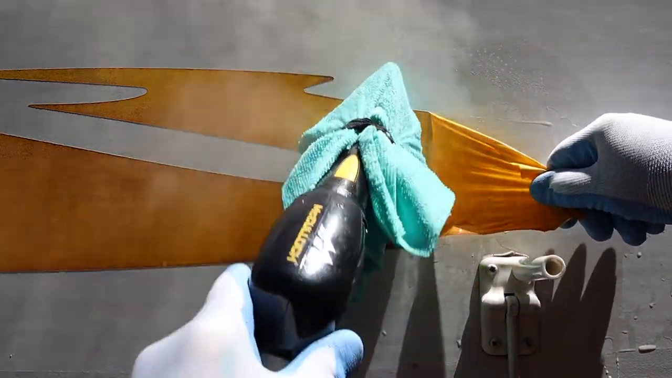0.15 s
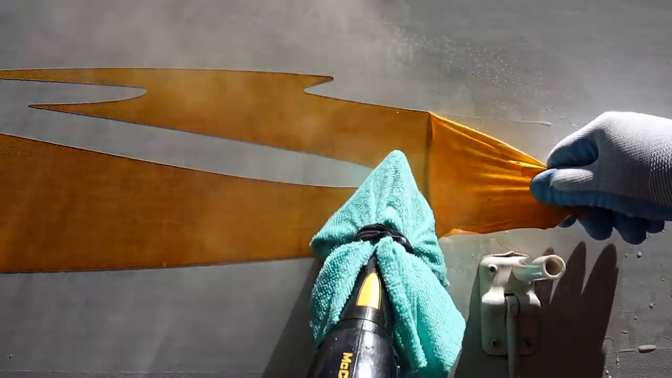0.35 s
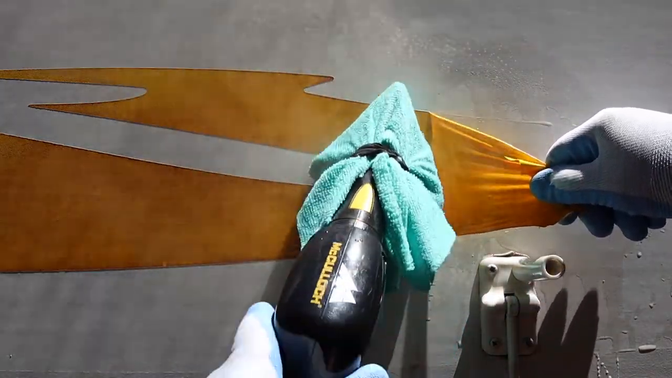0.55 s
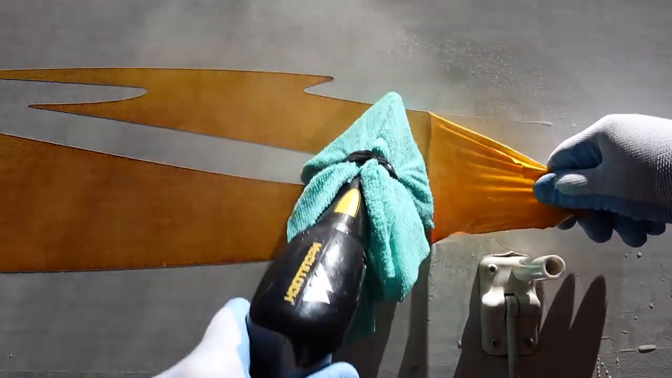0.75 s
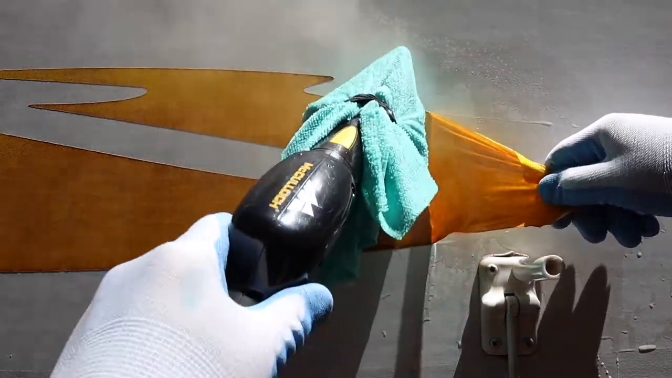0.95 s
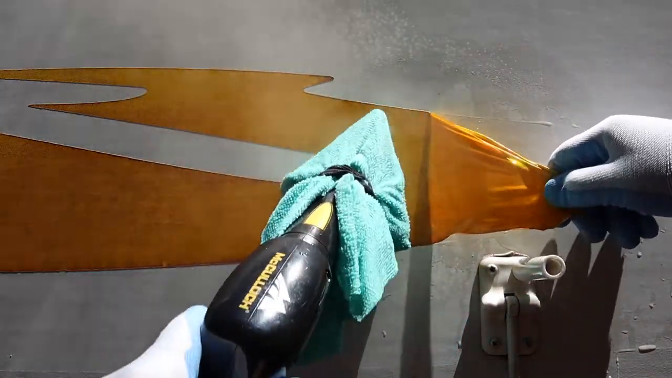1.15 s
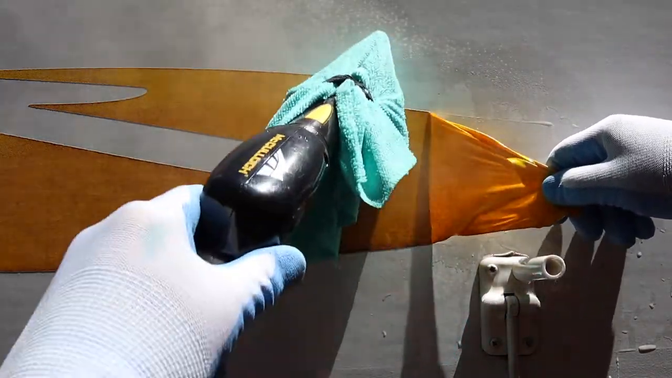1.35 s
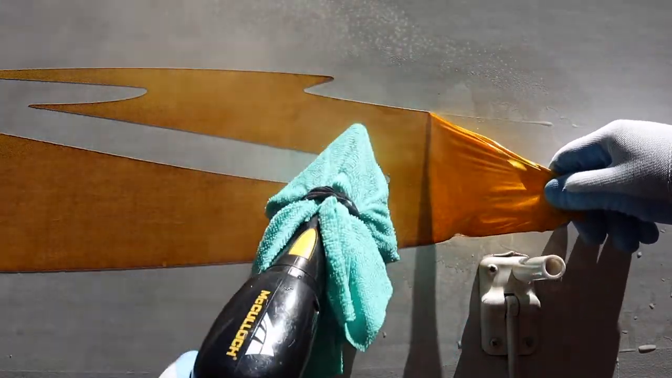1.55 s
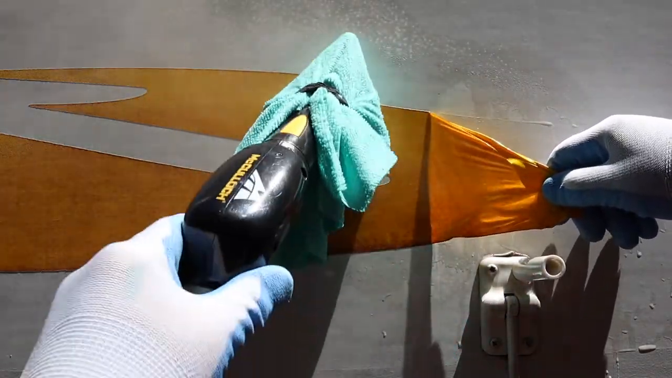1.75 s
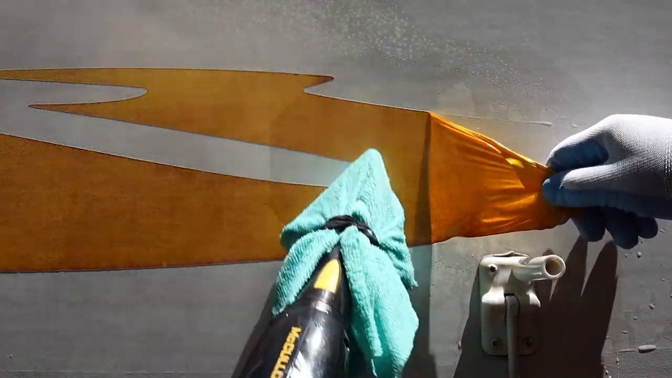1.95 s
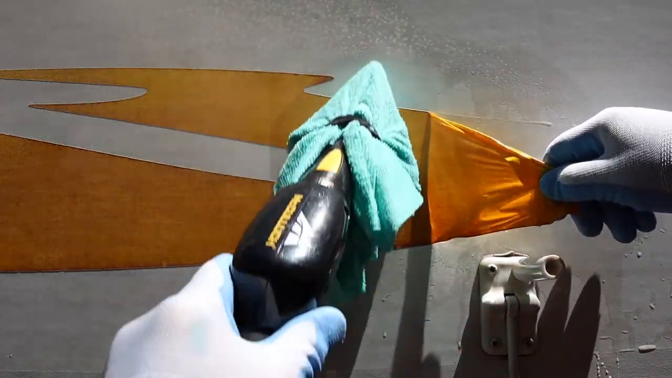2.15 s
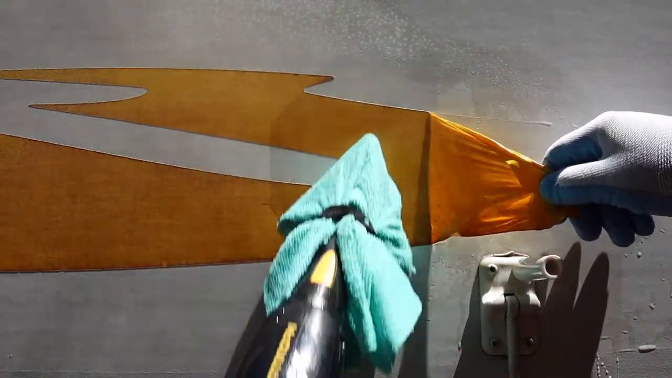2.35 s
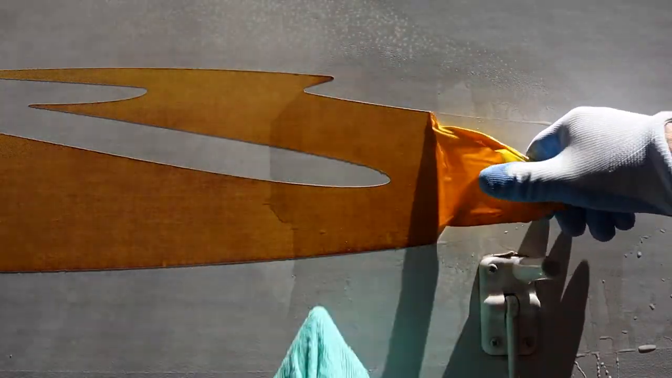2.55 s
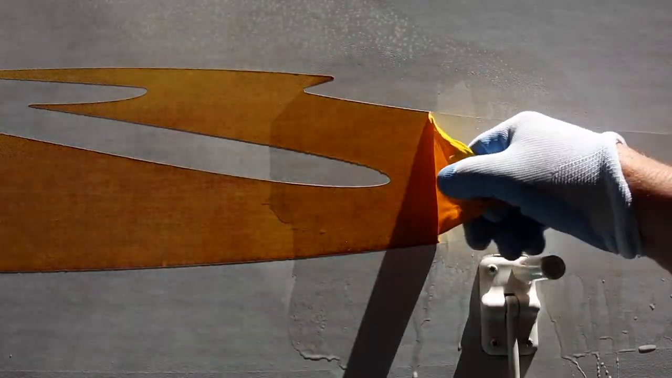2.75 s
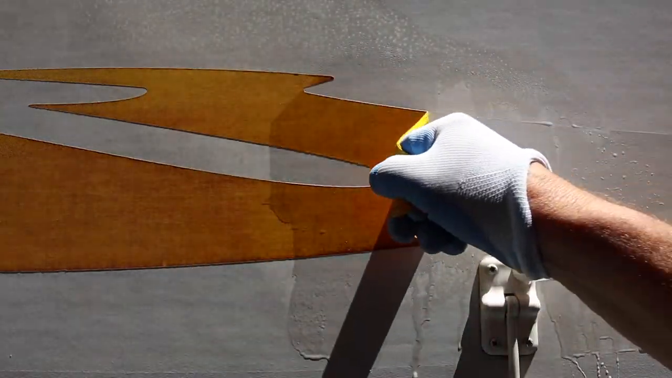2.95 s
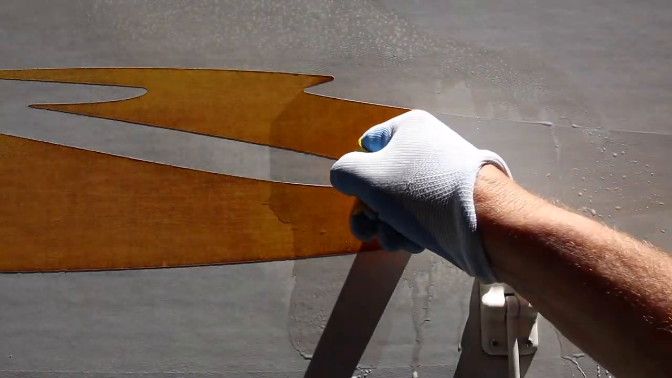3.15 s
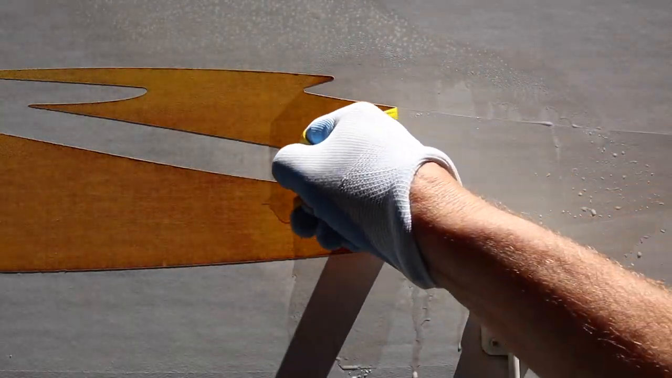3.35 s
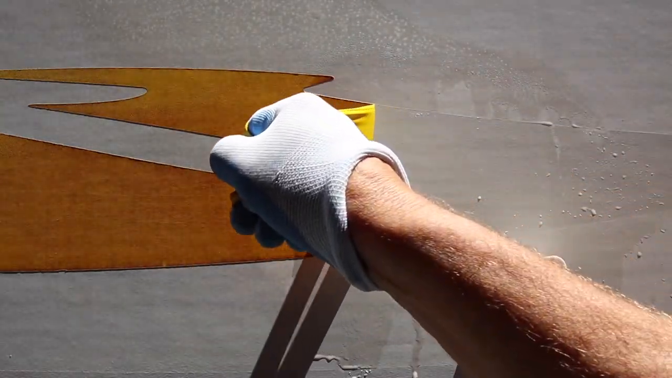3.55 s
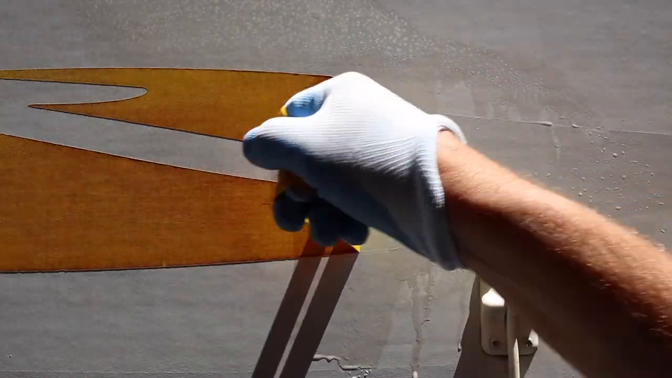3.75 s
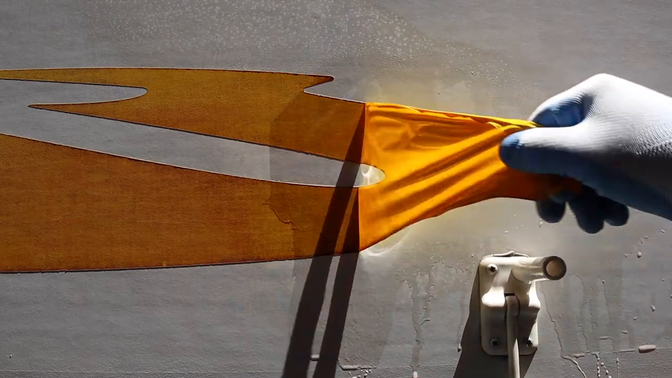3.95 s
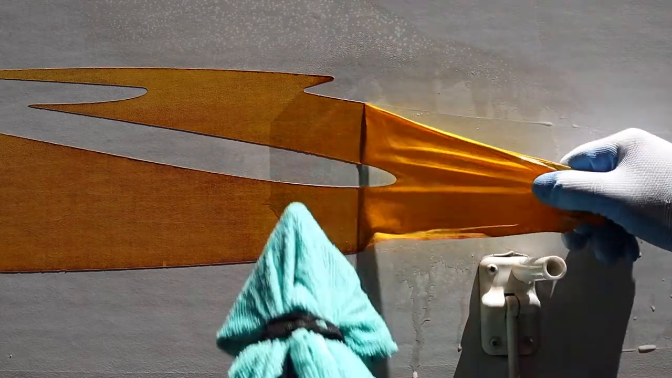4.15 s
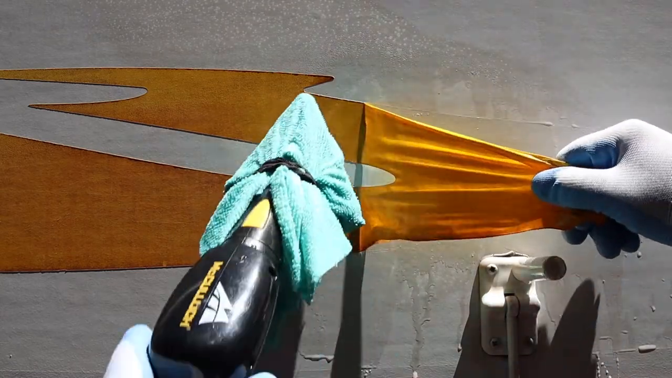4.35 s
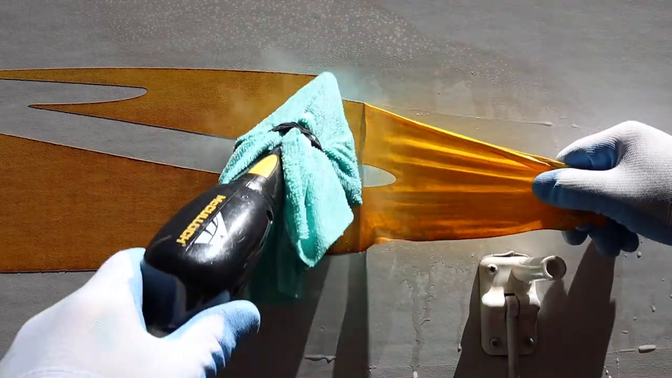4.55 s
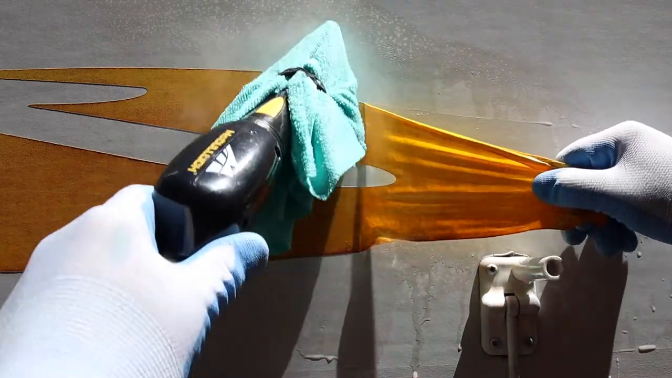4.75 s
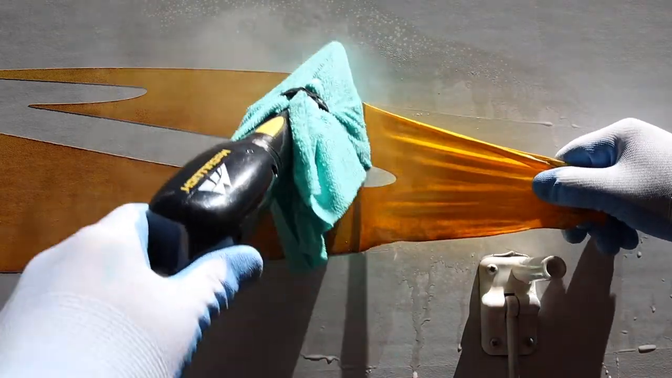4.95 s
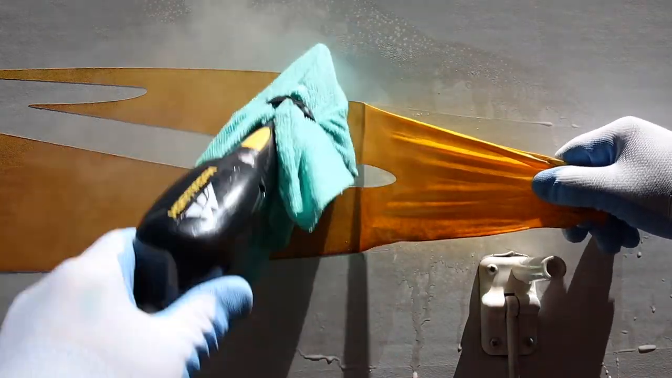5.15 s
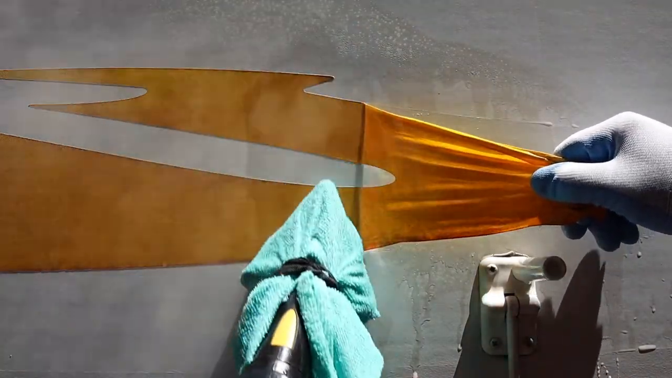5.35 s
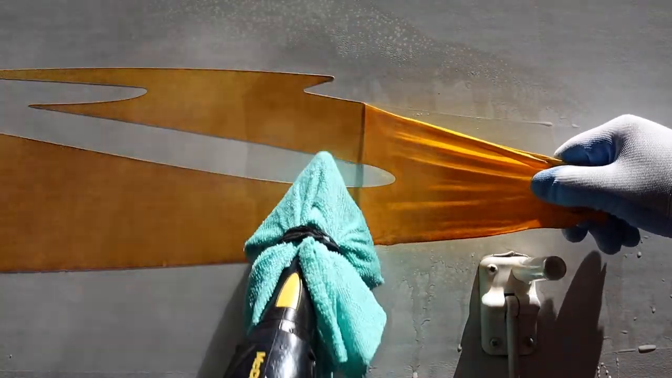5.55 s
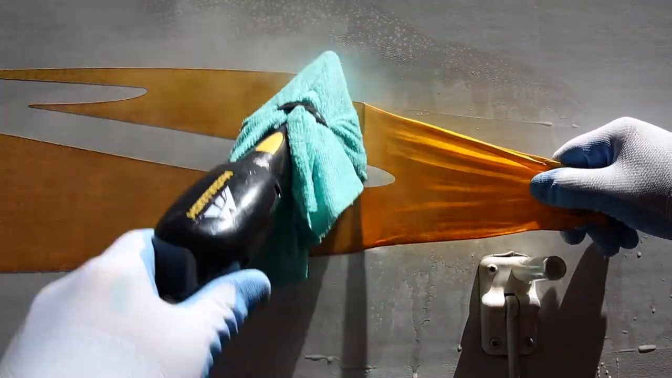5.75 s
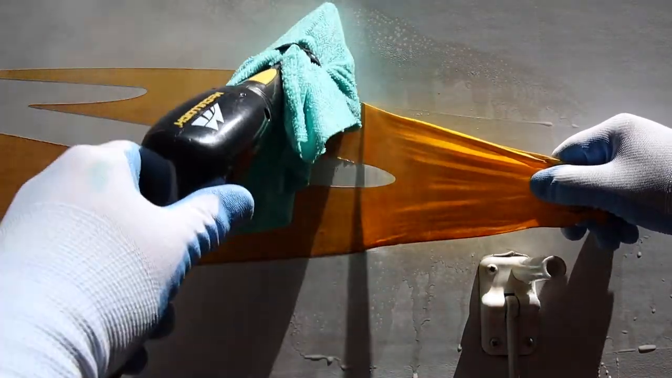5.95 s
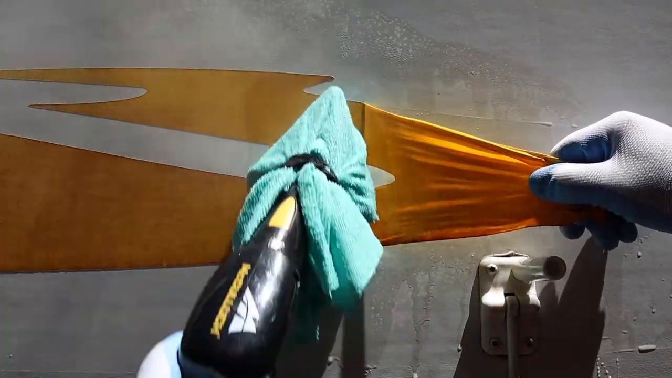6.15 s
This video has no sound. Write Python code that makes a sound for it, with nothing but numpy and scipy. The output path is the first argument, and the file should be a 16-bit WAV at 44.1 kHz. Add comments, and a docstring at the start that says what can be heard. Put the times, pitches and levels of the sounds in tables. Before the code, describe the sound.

A handheld steam jet hisses steadily through cloth, shuts off, vinyl snaps and crackles as it is peeled, then the hiss bursts back.

```python
"""The steady hiss of a handheld steam cleaner, its head in a towel, opens the scene in mid-blast by a smooth panel.
Jet turbulence is noise shaped by hose resonances and a valve; a second blast lasts to the end.
Between the blasts a gloved hand regrips and peels a vinyl sheet: decaying sines and noise bursts
make thumps, snaps and creaks, and sparse noise grains make the rustle.
Low noise with random swells is a light breeze on the microphone, over a far outdoor murmur."""
import sys
import numpy as np
from scipy import signal
from scipy.fft import rfft, irfft, next_fast_len
from scipy.io import wavfile
from scipy.ndimage import uniform_filter1d, map_coordinates

SR = 44100
rng = np.random.default_rng(int(sys.argv[2]) if len(sys.argv) > 2 else 0)


def wrap_up_sound(samples):
    """Save the sound to the file named by the first command line argument, as 16-bit audio."""
    columns = np.atleast_2d(samples).T
    # keep every value between -1 and 1, then stretch to whole-number steps
    tamed = np.clip(columns, -1, 1)
    steps = np.round(tamed * 32767).astype(np.int16)
    wavfile.write(sys.argv[1], SR, steps)


N = 274302
TIME = np.arange(N) / SR
STRIKE_TIME = np.arange(SR // 5) / SR  # time since a short event began, s

# Pulls of the trigger: (valve opens [s], starts to shut [s])
BLASTS = [(-1, 2.456), (4.5135, 7)]
# Likeness of the two microphone ports to a near source: (frequency [Hz], correlation [-1 to 1])
NEAR_LIKENESS = [(60, 1), (700, 1), (1400, 0.96), (3000, 0.84), (6000, 0.92), (10000, 0.34)]
# Likeness of the two ports to sound from all around: (frequency [Hz], correlation [-1 to 1])
DIFFUSE_LIKENESS = [(60, 1), (240, 1), (930, -0.08), (3670, -0.61), (14500, -0.47)]

OPEN_S, SHUT_S = .011, .023  # travel time of the valve
FIZZ_HZ, SIZZLE_HZ = 4270, 8000  # lower edges of the two treble bands


def amp(db):
    """Decibels to amplitude ratio: 20 dB is a factor of ten."""
    return 10 ** (np.asarray(db) / 20)


def unit(x):
    """Scale to a root-mean-square of 1."""
    return x / np.sqrt(np.mean(x ** 2) + 1e-20)


def along(points, hz):
    """Interpolate (frequency [Hz], value) points on a logarithmic frequency axis."""
    f, v = np.transpose(points)
    return np.interp(np.log(hz + 1), np.log(f + 1), v)


def curves(rows):
    """Interpolate each column after the time to one value per sample."""
    s, *columns = np.transpose(rows)
    return [np.interp(TIME, s, column) for column in columns]


def wobble(rate):
    """A smooth random curve: a spline through random knots, rate of them a second."""
    knots = rng.standard_normal(int(N * rate / SR) + 4)
    return map_coordinates(knots, [TIME * rate])


def filtered(x, response):
    """Linear filtering: the spectrum of x times a complex response of frequency."""
    m = next_fast_len(N + SR // 2)
    return irfft(rfft(x, m) * response(np.fft.rfftfreq(m, 1 / SR)), m)[..., :N]


def shaped(points):
    """Amplitude response through (frequency [Hz], level [dB]) points."""
    return lambda hz: amp(along(points, hz))


def band(lo_hz, hi_hz):
    """A soft-edged band whose neighbours add up in power."""
    return lambda hz: np.sqrt(np.abs(1 / (1 + (hz / hi_hz) ** 8) - 1 / (1 + (hz / lo_hz) ** 8)))


def resonances(modes):
    """Causal response of damped oscillators: (centre [Hz], width [Hz], peak level [dB])."""
    return lambda f: sum(amp(db) * 1j * f * w / (c * c - f * f + 1j * f * w) for c, w, db in modes)


def ports(pair, likeness, lead):
    """Interchannel coherence: mix two unrelated signals into left and right; their sum keeps its colour."""
    def mix(hz):
        like = np.clip(along(likeness, hz), -.95, 1)
        turn = np.arccos(like) / 2
        sum_gain = np.sqrt((1 + like * np.cos(along(lead, hz))) / 2)
        return [np.cos(turn), np.sin(turn)] / sum_gain

    def advance(hz):
        return np.exp(np.outer([.5j, -.5j], along(lead, hz)))  # left leads right

    common, difference = filtered(pair, mix)
    return filtered(np.array([common + difference, common - difference]), advance)


def hiss(colour, patchy_db):
    """Coloured turbulence: two noises of rms 1 whose gain varies in random time-frequency patches."""
    spectra = signal.stft(rng.standard_normal((2, N)), nperseg=512)[2]
    patches = rng.standard_normal(spectra.shape[1:])
    patches = uniform_filter1d(patches, size=8, axis=0)  # over frequency
    patches = uniform_filter1d(patches, size=12, axis=1)  # over time
    patchy = signal.istft(spectra * amp(patchy_db * unit(patches)), nperseg=512)[1][:, :N]
    return unit(filtered(patchy, colour))


def pressure():
    """Pressure release: the valve travels, stored steam bursts out, then the boiler slowly sags."""
    settled_db = -20  # after the burst, before the sag
    burst_db, burst_s, sag_db_per_s = 7.5, 0.066, 0.53
    flow = np.zeros(N)
    for opens, shuts in BLASTS:
        since = np.clip(TIME - opens, 0, None)
        opening = np.clip(since / OPEN_S, 0, 1) ** 2
        closing = np.sqrt(np.clip(1 - (TIME - shuts) / SHUT_S, 0, 1))
        level_db = settled_db + burst_db * np.exp(-since / burst_s) - sag_db_per_s * since
        flow += opening * closing * amp(level_db)
    return flow


def direct_jet(flow, jet):
    """Jet noise through standing waves: the hose colours turbulence and the moving towel shades its treble."""
    # Swings of the treble as the towel strokes up and down, before the hose:
    # (time [s], fizz over roar [dB], sizzle over roar [dB])
    treble = [(0, -8, -12), (.3, -1, -9.5), (.5, -9, -6.5), (.72, 0, -9.5), (.91, -11, -8), (1.1, -2, -7),
              (1.36, -9, -15.5), (1.56, -4.5, -7.5), (1.68, -15, -10.5), (1.85, -17, -9.5),
              (1.98, -1.5, -9.5), (2.2, -7.5, -12), (2.43, -2.5, -5), (4.53, -6, -21.5),
              (4.72, -25.5, -8.5), (4.9, -1, -9), (5.06, -20, -10), (5.17, -23.5, -5.5),
              (5.24, -2.5, -13.5), (5.47, -1.5, -9), (5.75, -8.5, -12), (5.96, -35, -6),
              (6.15, -1.5, -10.5)]
    # Standing waves in the hose: (frequency [Hz], width [Hz], level over the jet [dB])
    hose = [(334, 55, 0), (452, 19, -5.5), (642, 20, 0), (773, 29, -0.5), (913, 37, 3.5), (1081.5, 45, 6),
            (1264, 45, -8.5), (1375, 23.4, 7), (1566, 63, -4), (1681, 23, 6.5), (1850, 22, 3),
            (1980, 39, -4.5), (2138, 17, 0.5), (2294, 26, -11.5), (2410, 20, -1.5), (3065, 22, 1),
            (3400, 42, -2)]
    # Phase by which left leads right: (frequency [Hz], phase [rad])
    port_lead = [(100, 0), (2300, -.2), (3000, .8), (3500, 0), (7500, -.2), (9000, -1.2), (14600, -1.5)]
    # Left-minus-right level: (frequency [Hz], level [dB])
    port_balance = [(500, 0), (2200, -3), (2750, -7), (3300, -0.5), (5000, -1), (5800, -2.5), (7000, -1)]

    def part(lo_hz, hi_hz, patchy_db):
        return hiss(lambda hz: jet(hz) * band(lo_hz, hi_hz)(hz), patchy_db)

    fizz_db, sizzle_db = curves(treble)
    surge_db = .5 * wobble(10) + 0.46 * wobble(40)
    roar = amp(surge_db) * part(1, FIZZ_HZ, 1)
    fizz = amp(fizz_db + surge_db) * part(FIZZ_HZ, SIZZLE_HZ, 1.7)
    sizzle = amp(sizzle_db + 0.87 * surge_db + 0.83 * wobble(25)) * part(SIZZLE_HZ, 1e5, 4.0)

    rung = filtered(flow * (roar + fizz + sizzle), lambda hz: 1 + resonances(hose)(hz))
    direct = ports(rung, NEAR_LIKENESS, port_lead)
    left, right = filtered(direct, lambda hz: amp(np.outer([.5, -.5], along(port_balance, hz))))
    left = np.where(TIME < 3.5, np.roll(left, 1), left)  # the first blast sits a little further right
    return np.array([left, right])


def scattered_hiss(flow, jet):
    """Diffuse scattering: hiss arriving from all around escapes the shading by the towel."""
    # Scattered over direct hiss: (frequency [Hz], level [dB])
    scatter = [(500, -27), (1500, -12.5), (4000, -15), (8000, -9.5), (14000, -4.5)]
    around = filtered(flow * hiss(jet, patchy_db=2), shaped(scatter))
    return ports(around, DIFFUSE_LIKENESS, [(1, 0.00088)])


def hose_ringing():
    """Free decay: standing waves ring on after the first blast's valve slams shut."""
    # Hose tones: (frequency [Hz], starting level [dB], time to decay 60 dB [s])
    shut_tones = [(796, -37.5, 0.16), (1400, -28.5, 0.15), (1780, -34, 0.17)]
    since = np.clip(TIME - BLASTS[0][1] - SHUT_S, 0, None)
    ringing = np.zeros(N)
    for hz, db, t60 in shut_tones:
        phase = 2 * np.pi * hz * since + .6 * wobble(60)
        ringing += (since > 0) * amp(db - 60 * since / t60) * np.sin(phase)
    return ringing


def steam():
    """Superposition of direct jet, valve-slam ringing and scattered hiss, driven by one flow."""
    # Relative spectrum of the jet: (frequency [Hz], level per hertz [dB])
    jet = shaped([(120, -65), (200, -36), (326, -23.5), (404, -26), (623, -11), (682, -20), (788, -6.5),
                  (979, -8.5), (1400, -1.5), (2290, -5), (5150, -4), (8230, -19), (11200, -10),
                  (13200, -19.5), (14900, -48.5)])
    flow = pressure() * amp(0.33 * wobble(4))
    return direct_jet(flow, jet) + hose_ringing() + scattered_hiss(flow, jet)


def breeze():
    """Wind turbulence: lumpy low-frequency pressure with short gusts, nearly alike at both ports."""
    # Relative spectrum of the buffeting: (frequency [Hz], level per hertz [dB])
    buffet_colour = [(12, -45), (20, -1), (75, -4), (157, -11), (272, -25.5), (350, -49), (460, -65),
                     (770, -120)]
    # Course of the breeze: (time [s], strength before gusts [dB], deepest bass over it [dB])
    course = [(0, -64, 0), (.45, -55, 1), (1.3, -56, 6), (1.75, -49.5, 5.5), (2.4, -52, 4), (2.9, -55, -1),
              (3.3, -46, -1), (4.4, -51.5, -1.5), (5.05, -48.5, 0.5), (5.7, -57, 6), (6.22, -56, 0)]
    # Short gusts: (time [s], level over the breeze [dB])
    gusts = [(1.67, 5), (1.78, 0), (2.99, 9.5), (3.24, 12), (3.335, 9.5), (3.435, 5), (4.015, 8.5),
             (4.15, 6), (5.6, 8), (6.1, 9)]
    deep_hz, gust_s = 48, 0.033  # top of the deepest bass; half width of a gust to 1/e of its dB

    lumps = amp(1.55 * wobble(19)) * hiss(shaped(buffet_colour), patchy_db=-2.5)
    likeness = [(25, 1.0), (60, 1.0), (130, 0.96), (250, 0.79)]  # (frequency [Hz], correlation)
    buffet = unit(ports(lumps, likeness, [(1, 0.0061)]))
    gust_db = sum(db * np.exp(-((TIME - s) / gust_s) ** 2) for s, db in gusts)
    strength_db, deep_db = curves(course)
    deep = amp(deep_db) * filtered(buffet, band(1, deep_hz))
    rest = filtered(buffet, lambda hz: 1 - band(1, deep_hz)(hz))
    return amp(strength_db + gust_db) * (deep + rest) * amp([[-1], [1]])  # right is 2 dB stronger


def murmur():
    """Diffuse field: a steady far outdoor noise, less and less alike at the ports as frequency rises."""
    # Relative spectrum of the murmur: (frequency [Hz], level per hertz [dB])
    far_colour = [(120, -18), (200, -8), (285, -13.5), (415, -11.5), (541, -16.5), (906, -14), (990, -17),
                  (1060, -18.5), (1320, -22), (14000, -50)]
    far = hiss(shaped(far_colour), patchy_db=-1.0)
    return amp(-54.5) * ports(far, DIFFUSE_LIKENESS, [(1, 0)])


def yard(x):
    """Reverberation: nearby walls answer, and each frequency dies at its own speed."""
    # Reverberation time: (frequency [Hz], time to decay 60 dB [s])
    decay = [(200, 0.2), (1500, 0.24), (5000, 0.2), (12000, 0.1)]
    hz, t, spectra = signal.stft(rng.standard_normal((2, SR // 2)), SR, nperseg=256)
    fading = amp(-60 * t / along(decay, hz)[:, None])
    tail = signal.istft(spectra * fading, SR, nperseg=256)[1]
    delayed = np.pad(x, ((0, 0), (250, 0)))  # samples before the first answer
    return signal.fftconvolve(delayed, tail / np.linalg.norm(tail[0]), axes=1)[:, :N]


def add_at(out, s, sound):
    """Superpose a short sound at s seconds."""
    out[round(s * SR):][:len(sound)] += sound


def thumps():
    """Damped oscillation: low pushes of valve and hand lose 16 dB each cycle."""
    # Pushes: (time [s], starting level [dB], frequency [Hz])
    pushes = [(2.473, -19.5, 285), (2.9591, -24, 200), (4.122, -27.5, 180), (4.516, -22, 240)]
    out, t = np.zeros(N + SR), STRIKE_TIME
    for s, db, hz in pushes:
        add_at(out, s, amp(db - 16 * hz * t) * np.sin(2 * np.pi * hz * t))
    return out[:N]


def snaps():
    """Impulsive release: vinyl and glove let go in a dry click and short tail, in one broad band each."""
    # Snaps: (time [s], peak level [dB], centre frequency [Hz])
    releases = [(2.6674, -36, 3040), (2.692, -41, 2000), (2.7225, -19, 4600), (2.734, -32, 2170),
                (2.7384, -40.5, 5020), (2.817, -44, 2200), (2.885, -41, 1800), (2.925, -48, 4000),
                (2.959, -15, 1670), (2.961, -17.5, 4740), (3.747, -49, 4500), (3.772, -43, 2200),
                (3.868, -46, 2500), (3.89, -41, 3000), (3.952, -35, 5000), (4.075, -35.5, 8000),
                (4.112, -36, 8000), (4.1193, -18.5, 5900), (4.2, -35, 9050), (4.3035, -32, 5000),
                (4.309, -37, 4000)]
    out, t = np.zeros(N + SR), STRIKE_TIME
    onset = 1 - np.exp(-t / 0.00022)
    for s, db, hz in releases:
        source = rng.standard_normal(len(t)) + 0.79 * np.sin(2 * np.pi * hz * t)
        click = amp(-60 * t / 0.0035) * source
        tail = 0.035 * amp(-60 * t / 0.033) * rng.standard_normal(len(t))
        broad = signal.butter(2, [hz / 2.6, min(hz * 3.3, 12500)], "band", fs=SR)
        crack = signal.lfilter(*broad, onset * (click + tail))
        add_at(out, s, amp(db) * crack / np.abs(crack).max())
    return out[:N]


def rustle():
    """Adhesive failure: the film lets go of the glue in dense tiny crackles under each pull."""
    # Pulls: (peak time [s], rise [s], fall [s], bright level [dB], dull part over it [dB]);
    # rise and fall each span 20 dB
    pulls = [(2.67, .006, .07, -54.5, 6.5), (2.74, 0.019, 0.016, -44.5, -2), (2.82, .04, .1, -73, 9),
             (3.82, 0.067, 0.076, -50.5, -18), (3.865, 0.092, .05, -47.5, -15),
             (3.956, 0.049, 0.13, -43.5, -11), (4.08, .03, 0.0236, -57, -13), (4.118, .02, 0.051, -43, -7),
             (4.165, .05, .06, -53.5, 0), (4.309, .009, 0.032, -56.5, 5.5), (4.47, 0.037, 0.24, -62, 3)]
    # Relative spectrum of the bright part: (frequency [Hz], level per hertz [dB])
    film_colour = [(880, -30), (1500, 7), (2120, -4), (2650, 0), (10500, -2.5), (12200, -11), (14500, -32),
                   (14900, -47)]
    high, low = np.zeros((2, N))
    for s, rise, fall, db, low_db in pulls:
        distance = np.where(TIME < s, (s - TIME) / rise, (TIME - s) / fall)
        pull = amp(db - 20 * distance)
        high = np.hypot(high, pull)  # pulls add in power
        low = np.hypot(low, amp(low_db) * pull)

    crackles = 1 + 5 * (rng.random(N) < .007) * rng.uniform(0, 2, N)  # rare samples stand out
    grains = rng.standard_normal((2, N)) * crackles * amp(2.5 * wobble(200))
    bright = unit(filtered(grains, lambda hz: shaped(film_colour)(hz) * band(2000, 1e5)(hz)))
    dull = unit(filtered(grains, band(540, 2000)))
    return ports(high * bright + low * dull, NEAR_LIKENESS, [(1, 0)])


def panel_blow():
    """Modal excitation: an impulse and a decaying noisy rattle drive the resonances of the panel."""
    # Modes of the panel: (frequency [Hz], width [Hz], level [dB])
    panel = [(200, 200, -1), (650, 480, -3.5), (1290, 250, -7), (2600, 1500, -21)]
    # The blow: (time [s], drive level [dB])
    blow_s, blow_db = (2.9595, -16.5)
    t = STRIKE_TIME
    noise = uniform_filter1d(rng.standard_normal(len(t)), size=5)
    rattle = amp(0.5 - 60 * t / .19) * noise  # dies by 60 dB in .19 s
    drive = np.zeros(N)
    add_at(drive, blow_s, amp(blow_db) * (5 * (t == 0) + rattle))
    return filtered(drive, resonances(panel))


def creaks():
    """Stick-slip friction: each slip is a damped tone with a noisy tick, slightly irregular in time and size."""
    # Creaks: (start [s], end [s], slips per second [1/s], mean level [dB], tone [Hz], tick over it [dB])
    slips = [(3.976, 4.074, 80, -40, 1610, -21), (4.1219, 4.172, 130, -39, 145, -3)]
    out, t = np.zeros(N + SR), STRIKE_TIME
    for start, end, rate, db, hz, tick_db in slips:
        chance = rng.standard_normal((30, 2))
        for s, (late, size) in zip(np.arange(start, end, 1 / rate), chance):
            slip = np.sin(2 * np.pi * hz * t) * amp(-60 * t / (5 / hz + 0.0034))
            tick = amp(tick_db - 60 * t / .005) * rng.standard_normal(len(t))
            add_at(out, s + .0006 * late, amp(db + 2 * size) * (slip + tick))
    return out[:N]


def scene():
    """Superposition: direct sources, their reflections and the outdoor sounds add linearly."""
    jet = steam()
    outdoors = breeze() + murmur()
    left, right = thumps() + snaps() + rustle() + panel_blow() + creaks()
    # the hand works on the right: left comes two samples later, right is 4 dB stronger
    hand = np.array([np.roll(left, 2), amp(4.0) * right])
    thin = filtered(hand, band(270, 1e5))  # open air returns little bass
    return jet + amp(-14) * yard(jet) + hand + amp(-9.5) * yard(thin) + outdoors


def record(dry):
    """Band limiting and soft saturation: treble fades near 13 kHz, peaks round off, 15 kHz is the limit."""
    dulled = filtered(dry, lambda hz: 1 / np.sqrt(1 + (hz / 13000) ** 12))
    soft = dulled / (1 + np.abs(dulled) ** 8) ** (1 / 8)
    return filtered(soft, lambda hz: hz < 15000)


dry = scene()
out = record(dry)
wrap_up_sound(out)
```